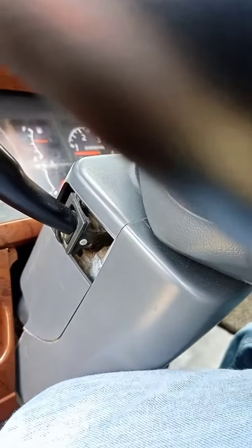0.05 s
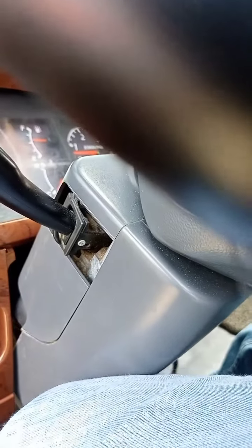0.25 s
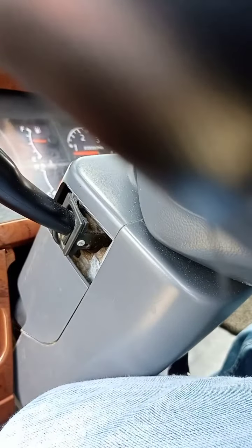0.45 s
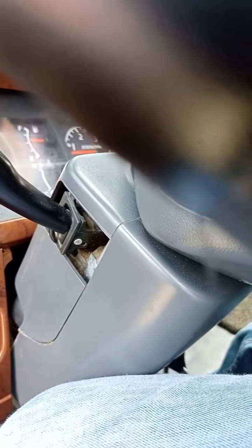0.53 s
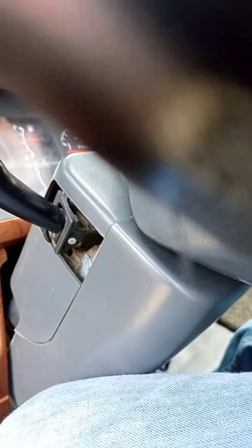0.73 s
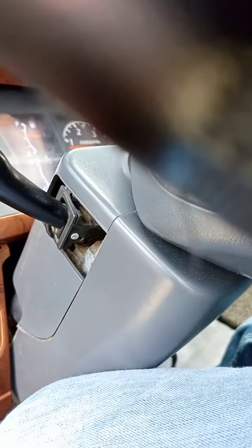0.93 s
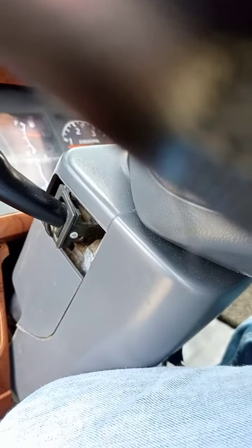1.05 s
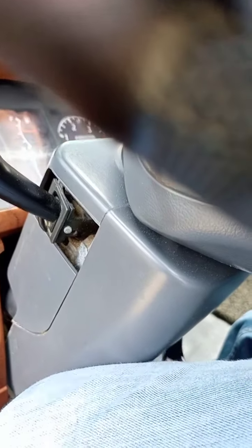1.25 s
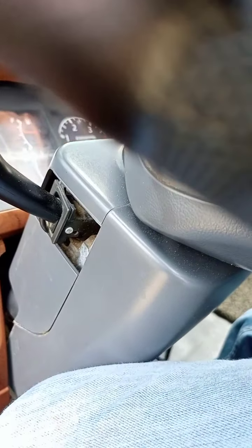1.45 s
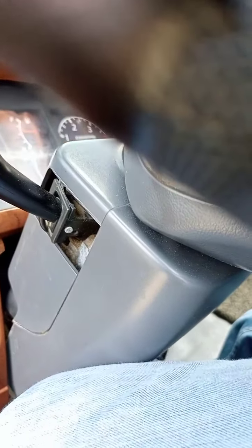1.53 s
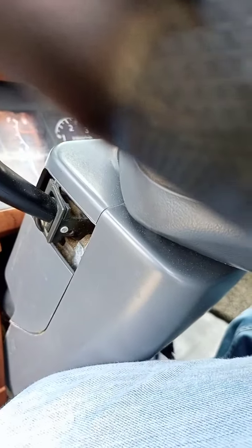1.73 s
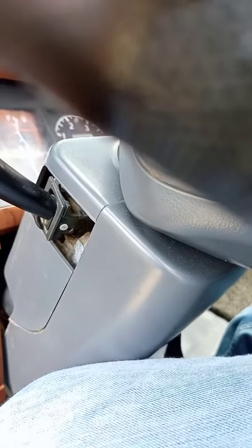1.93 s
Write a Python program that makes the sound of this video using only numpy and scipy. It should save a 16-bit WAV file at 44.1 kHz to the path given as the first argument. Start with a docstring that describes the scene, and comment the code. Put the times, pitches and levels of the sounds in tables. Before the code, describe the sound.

A diesel engine idles steadily for the whole two seconds, a low uneven drone with about nineteen soft knocks a second, faint valve clatter and broad cab roar. Very faint rustles surround a sharp, bright plastic tick at 0.34 s; another rustle comes near 0.7 s. At 1.09 s a column lever snaps loudly in a dense rattle with a dull thud and scrape, a lighter click near 1.15 s, then only idling.

```python
"""A four-cylinder diesel idles throughout, heard close up inside a small cab: harmonics of the firing rate
form the drone, filtered noise bursts the knock and valve clatter, shaped noise the roar and uneven rumble;
an accessory hum of two tones under one level curve lies beside the firing orders. Brushes of noise rustle
faintly; a small plastic switch ticks by decaying modes, and faint rustles follow. Last, a column lever snaps
over in a rattle of blows on its modes while the column thuds and rough noise drags, then it settles."""
import sys
import numpy as np
from scipy import signal
from scipy.fft import rfft, irfft, next_fast_len
from scipy.io import wavfile
from scipy.ndimage import uniform_filter1d, map_coordinates

SR = 44100
rng = np.random.default_rng(int(sys.argv[2]) if len(sys.argv) > 2 else 0)


def volts_from_db(level):
    """Convert decibel levels to linear amplitude ratios."""
    exponent = np.asarray(level, float) / 20
    return 10 ** exponent


def generate_wav(signal):
    """Clip the signal to [-1, 1] and save it as 16-bit WAV at the path in sys.argv[1]."""
    frames = np.transpose(np.atleast_2d(signal))
    scaled = np.clip(frames, -1, 1) * 32767
    pcm = np.round(scaled).astype(np.int16)
    wavfile.write(sys.argv[1], SR, pcm)


N = 88200
T = np.arange(N) / SR

# Steady cab roar, relative spectrum: [f/Hz, level/dB per Hz]
CAB_SPECTRUM = [(15, -43), (25, -13), (91, 0), (164, -12), (281, -6), (580, -8.5), (868, -13),
                (1330, -13.5), (1570, -20.5), (2050, -14.5), (2470, -20), (3070, -19), (6340, -38),
                (12700, -54.5), (15400, -64)]
# Low rumble, relative spectrum: [f/Hz, level/dB per Hz]
RUMBLE_SPECTRUM = [(50, -65), (72, -7), (105, 6), (130, -5.5), (220, -4.5), (300, -5.5), (500, -10.5),
                   (800, -60)]
# Level of the rumble, random low noise uneven by chance: [t/s, level/dB rms]
RUMBLE_LEVEL = [(0, -50), (.25, -38), (.4, -37), (.55, -42), (.68, -41.5), (.85, -32), (1.1, -53.5),
                (1.3, -42.5), (1.5, -41), (2, -38)]
# Centres of the rustles: [t/s]
RUSTLE_TIMES = [.168, .322, .706, .705]
# Rustles in the same order: [length t/s, level/dB, centre f/Hz]
RUSTLES = [(0.0054, -53, 7400), (0.00085, -47, 6300), (0.0076, -45, 5500), (.002, -57, 11000)]
# Contacts of the switch: [t/s, level/dB]
SWITCH_CONTACTS = [(.3436, -27), (.3444, -9)]
# Modes of the switch: [f/Hz, mean level/dB, T60 t/s]
SWITCH_MODES = [(3400, -8, .007), (3600, 6, .012), (3950, -17, .035), (4400, -3, .006), (6280, -16, .014),
                (6600, -20, .012), (7310, -20, .014), (150, -26, .12)]
# Blows of the lever: [t/s, level/dB, chatter decay t/s]
LEVER_BLOWS = [(1.0865, -18.5, 0.0016), (1.0893, -9, 0.0047), (1.0924, -10.5, 0.0024),
               (1.0982, -9.5, 0.0032), (1.1045, -10.5, 0.0033), (1.112, -24.5, 0.01),
               (1.124, -32.5, 0.0059), (1.1355, -29.5, 0.0025), (1.144, -32, 0.0049), (1.152, -24, 0.0015),
               (1.1546, -17.5, 0.00032), (1.158, -42, 0.0045)]
# Modes of the lever, before detuning: [mean f/Hz, mean level/dB, T60 t/s]
LEVER_MODES = [(430, -27, 0.071), (514, -11, 0.069), (575, -9.5, 0.039), (776, -12.5, 0.065),
               (844, -3, 0.028), (1285, 0.5, 0.015), (1514, -5.5, 0.01), (1917, -4.5, 0.033),
               (2189, -7.5, 0.06), (2260, 1, 0.024), (2570, 1.5, 0.012), (2830, -10.5, 0.014),
               (2980, -1.5, 0.04), (3465, -4.5, 0.028), (3730, -6, 0.034), (4480, -4, 0.016),
               (4950, -7.5, 0.02), (5990, -15.5, 0.031)]
# Rubbing of the lever: [t/s, level/dB before the drag gain]
DRAG_LEVEL = [(1.084, -75), (1.092, -42), (1.1, -30), (1.127, -62), (1.154, -37), (1.187, -69), (1.2, -92)]
# Spectrum of rubbing and crunch: [f/Hz, gain/dB]
RUB_SPECTRUM = [(800, 1), (1300, -8), (2650, 3.5), (4000, -10), (5600, -6), (7500, -12.5), (10000, -26.5),
                (14000, -24.5), (16000, -45)]
# Tones of the accessory, before the level curve: [f/Hz, level/dB rms]
HUM_TONES = [(112.6, -41), (225.2, -49)]
# Level of the hum, standing in for its beating with nearby engine tones: [t/s, gain/dB]
HUM_LEVEL = [(0, -0.5), (.45, -3.5), (.6, 5.5), (.68, -20), (.72, 5), (.85, 2.5), (1.05, -1), (1.25, -21),
             (1.45, 3.5), (2, -29)]
# Firing orders, before their waver: [multiple of the firing rate, level/dB rms]
FIRING_ORDERS = [(4, -48), (4.25, -60), (5, -45), (5.25, -52), (6.25, -46.5), (7, -55.5), (8, -51.5),
                 (10, -50), (11, -50.5), (12, -50), (13, -56), (14, -51.5), (15, -46)]
# Cylinders in firing order, relative: [knock level/dB, block ring level/dB, clatter level/dB]
CYLINDERS = [(0, -1, 1), (1, 5, 5), (0, 0, -1), (0, -1, -1)]
# Combustion knock, relative spectrum: [f/Hz, level/dB per Hz]
KNOCK_SPECTRUM = [(250, -3), (450, -7), (870, 0.5), (1570, -6), (2220, -1.5), (2610, -13), (3300, -9),
                  (6340, -25), (9000, -36)]
# Resonances of the engine block, relative: [f/Hz, width f/Hz, level/dB]
BLOCK_MODES = [(479, 20, -11), (707.5, 20.6, 7.5), (889, 25, 4), (1345, 36, -2), (2350, 110, -12),
               (2995, 41, 2), (4100, 55, -5), (4606, 124, -12.5)]
# The block's ring comes and goes: [t/s, gain/dB]
RING_WANDER = [(.27, 3.5), (.48, -1.5), (.9, 0), (1.32, 0), (1.53, 0.5), (1.75, 3.5)]
# Valve clatter, relative spectrum: [f/Hz, level/dB per Hz]
CLATTER_SPECTRUM = [(4000, 4), (6000, -34), (7200, -1.5), (9000, 8), (11000, 11), (13000, 19), (15000, -3),
                    (16000, -30)]

FIRING_HZ = 19.17


def unit(x):
    """Normalisation: a signal divided by its root mean square has rms 1."""
    return x / np.sqrt(np.mean(x ** 2) + 1e-20)


def filtered(x, response):
    """Linear filtering: the spectrum is multiplied by a response of frequency."""
    size = next_fast_len(N + 8192)
    return irfft(rfft(x, size) * response(np.fft.rfftfreq(size, 1 / SR)), size)[:N]


def colour(points):
    """Spectral shaping: gain is interpolated in dB over log frequency, near silent outside the points."""
    f, db = np.transpose(points)
    return lambda hz: volts_from_db(np.interp(np.log(hz + 1), np.log(f + 1), db, left=-120, right=-120))


def wobble(rate):
    """Slow modulation: a smooth curve through random knots, rate of them a second."""
    return map_coordinates(rng.standard_normal(int(N * rate / SR) + 4), [T * rate])


def ring(modes, attack_s, spread_db):
    """Modal superposition: a blow excites decaying sines whose levels scatter randomly."""
    t = T[:SR // 6]
    hz, db, t60 = np.transpose(modes)[:, :, None]
    db = db + spread_db * rng.standard_normal(db.shape)
    partials = volts_from_db(db - 60 * t / t60) * np.sin(2 * np.pi * hz * t)
    return partials.sum(0) * (1 - np.exp(-t / attack_s)) ** 2


def cab():
    """Broadband radiation: panels and air give a patchy roar over an uneven low rumble, both shaped noise."""
    roar = unit(filtered(rng.standard_normal(N), colour(CAB_SPECTRUM)))
    roar_db = -38.5 + 0.7 * wobble(12.27)
    rumble = unit(filtered(rng.standard_normal(N), colour(RUMBLE_SPECTRUM)))
    rumble_db = np.interp(T, *np.transpose(RUMBLE_LEVEL))
    return roar * volts_from_db(roar_db) + rumble * volts_from_db(rumble_db)


def rustles():
    """Friction noise: trim or cloth brushes faintly, each a band of noise under a Gaussian envelope."""
    log_width = 0.28  # in natural log of frequency
    out = np.zeros(N)
    for s, (length, db, centre) in zip(RUSTLE_TIMES, RUSTLES):
        band = lambda hz: np.exp(-(np.log((hz + 1) / centre) / log_width) ** 2)
        puff = unit(filtered(rng.standard_normal(N), band))
        out += volts_from_db(db) * np.exp(-((T - s) / length) ** 2) * puff
    return out


def switch():
    """Impact on a small body: each contact rings plastic modes and adds a short fizz of differenced noise."""
    fizz_db, fizz_t60_s = -35.5, 0.015
    out = np.zeros(N)
    for s, db in SWITCH_CONTACTS:
        tick = ring(SWITCH_MODES, attack_s=0.0004, spread_db=1)
        fizz = np.convolve(rng.standard_normal(len(tick)), [1, 0, -1], "same")
        fizz = fizz * volts_from_db(fizz_db - 60 * T[:len(tick)] / fizz_t60_s)
        out[round(s * SR):][:len(tick)] += volts_from_db(db) * (tick + fizz)
    return out


def lever_blows():
    """Repeated impact: each blow is a decaying chatter that excites the lever's modes and crunches broadly."""
    detune = 0.018  # loose parts ring a little off at each blow
    heavy_db, thump_hz = -20, 1000  # lighter blows weaken the modes below thump_hz
    crunch_db, crunch_top_hz = 7, 7500
    lever, crunch = np.zeros((2, N))
    t = T[:SR // 50]
    for s, db, decay_s in LEVER_BLOWS:
        modes = []
        for hz, level, t60 in LEVER_MODES:
            weakening = min(db - heavy_db, 0) * (hz < thump_hz)
            modes.append((hz * (1 + detune * rng.standard_normal()), level + weakening, t60))
        chatter = rng.standard_normal(len(t)) * np.exp(-t / decay_s)
        rung = ring(modes, attack_s=0.00027, spread_db=1)
        blow = signal.fftconvolve(rung, chatter)
        blow *= np.linalg.norm(rung) / np.linalg.norm(blow)  # chatter leaves the energy unchanged
        lever[round(s * SR):][:len(blow)] += volts_from_db(db) * blow
        crunch[round(s * SR):][:len(chatter)] += volts_from_db(db + crunch_db) * chatter
    lever = signal.sosfilt(signal.butter(4, 250, "high", fs=SR, output="sos"), lever)
    rub = colour(RUB_SPECTRUM)
    return lever + filtered(crunch, lambda hz: rub(hz) / (1 + (hz / crunch_top_hz) ** 4))


def column_thud():
    """Single-mode response: the column thuds once as one damped low sine."""
    thud = ring([(195, -16.5, 0.096)], attack_s=0.0021, spread_db=3)  # (f/Hz, mean level/dB, T60 t/s)
    out = np.zeros(N)
    out[round(1.091 * SR):][:len(thud)] += thud
    return out


def lever_drag():
    """Sliding friction: dense random grains, shaped in spectrum and level, are heard as rough rubbing noise."""
    grains_per_s, drag_gain_db = 20000, 17.5
    grains = rng.standard_normal(N) * (rng.random(N) < grains_per_s / SR)
    s, db = np.transpose(DRAG_LEVEL)
    level_db = drag_gain_db + np.interp(T, s, db, left=-120, right=-120)
    return unit(filtered(grains, colour(RUB_SPECTRUM))) * volts_from_db(level_db)


def accessory_hum():
    """Tonal radiation: two tones with slowly drifting phase sound under one level curve."""
    drift_rad = 0.3
    level = volts_from_db(np.interp(T, *np.transpose(HUM_LEVEL)))
    hum = np.zeros(N)
    for hz, db in HUM_TONES:
        hum += volts_from_db(db) * np.cos(2 * np.pi * hz * T + drift_rad * wobble(1.03))
    return np.sqrt(2) * level * hum  # a sine's peak is root two times its rms


def drone():
    """Periodic excitation: multiples of the firing rate sound as tones whose levels waver independently."""
    lead_s, waver_db = 0.01201, 2.5
    turn = 2 * np.pi * FIRING_HZ * (T + lead_s)
    out = np.zeros(N)
    for k, db in FIRING_ORDERS:
        phase = (k > 6) * rng.uniform(0, 2 * np.pi)  # low orders stay in phase
        out += volts_from_db(db + waver_db * wobble(4.5)) * np.cos(k * turn + phase)
    return np.sqrt(2) * out


def bursts(column, rise_s, fall_s):
    """Cyclic impulsive noise: one burst a firing, part fresh and part repeated by its cylinder."""
    first_s, jitter_s, scatter_db = -0.003, 0.001, 1.5
    same_share = 0.45  # of the noise power
    count, size = int(N / SR * FIRING_HZ) + 3, SR // 10
    k, t = np.arange(-1, count), T[:size]
    draw = rng.standard_normal((len(k), 2))
    repeated = rng.standard_normal((4, size))[k % 4]
    fresh = rng.standard_normal((len(k), size))
    noise = np.sqrt(same_share) * repeated + np.sqrt(1 - same_share) * fresh
    shape = (1 - np.exp(-t / rise_s)) ** 2 * np.exp(-t / fall_s)
    gain = volts_from_db(np.array(CYLINDERS)[k % 4, column] + scatter_db * draw[:, 0])
    onset_s = first_s + k / FIRING_HZ + jitter_s * draw[:, 1]
    start = np.round(onset_s * SR).astype(int) + size  # room for bursts that begin before zero
    places = start[:, None] + np.arange(size)
    summed = np.bincount(places.ravel(), (gain[:, None] * shape * noise).ravel())
    return summed[size:size + N]


def block(hz):
    """Resonance: the block's response sums bandpass modes of alternating sign."""
    response = 0
    for k, (centre, width, db) in enumerate(BLOCK_MODES):
        damping = 1j * hz * width
        response = response + (-1) ** k * volts_from_db(db) * damping / (centre ** 2 - hz ** 2 + damping)
    return response


def combustion():
    """Impulsive excitation: firings give knock, the block rings with them, and the valves clatter."""
    knock = unit(filtered(bursts(column=0, rise_s=0.0029, fall_s=0.02), colour(KNOCK_SPECTRUM)))
    rung = unit(filtered(bursts(column=1, rise_s=0.011, fall_s=0.011), block))
    clatter = unit(filtered(bursts(column=2, rise_s=0.01, fall_s=0.011), colour(CLATTER_SPECTRUM)))
    ring_db = -48 + np.interp(T, *np.transpose(RING_WANDER))
    return volts_from_db(-45) * knock + volts_from_db(ring_db) * rung + volts_from_db(-72) * clatter


def scene():
    """Superposition: engine outside the bulkhead, controls near; a damped cab's decaying tail follows the latter."""
    cab_t60_s, cab_wet_db = 0.06, -17
    near = rustles() + switch() + lever_blows() + column_thud() + lever_drag()
    tail = rng.standard_normal(SR // 5) * volts_from_db(-60 * T[:SR // 5] / cab_t60_s)
    delayed = np.pad(near, (130, 0))  # samples before the tail begins
    wet = signal.fftconvolve(delayed, tail / np.linalg.norm(tail))[:N]
    engine = accessory_hum() + drone() + combustion()
    return (cab() + near + volts_from_db(cab_wet_db) * wet + engine)[None]


def top_cut(x):
    """Nothing passes above the cut-off."""
    return signal.sosfilt(signal.butter(12, 15530, fs=SR, output="sos"), x)


def record(dry):
    """Dynamic compression in a phone: bass cut, gain that ducks after loud sounds, soft ceiling, band limit."""
    agc_start_db, agc_slope, agc_time_s = -16, 0.92, 0.061
    ceiling, top_hz = 1.2, 15600
    cut = signal.sosfilt(signal.butter(2, 61.7, "high", fs=SR, output="sos"), dry)
    power = np.abs(uniform_filter1d(cut ** 2, size=SR // 200))
    level_db = 10 * np.log10(power + 1e-12)
    excess_db = np.maximum(level_db - agc_start_db, 0)
    keep = np.exp(-1 / (agc_time_s * SR))
    duck_db = signal.lfilter([1 - keep], [1, -keep], agc_slope * excess_db)
    ducked = cut * volts_from_db(-duck_db)
    limited = ducked / (1 + np.abs(ducked / ceiling) ** 4) ** (1 / 4)
    mix = filtered(limited[0], lambda hz: hz < top_hz)[None]
    return top_cut(mix)


dry = scene()
out = record(dry)
generate_wav(out)
```